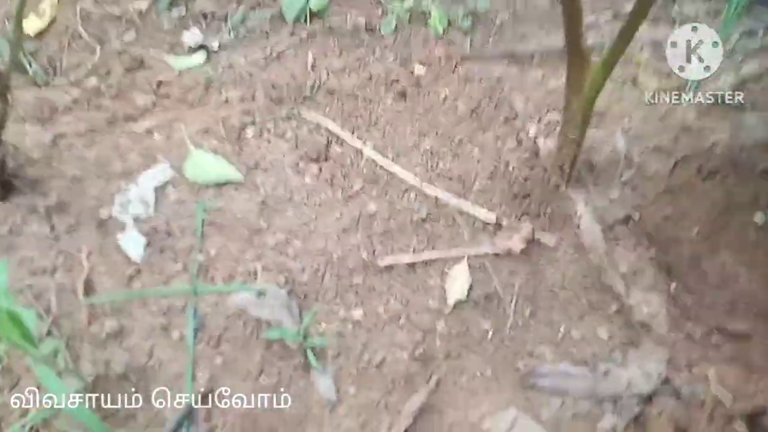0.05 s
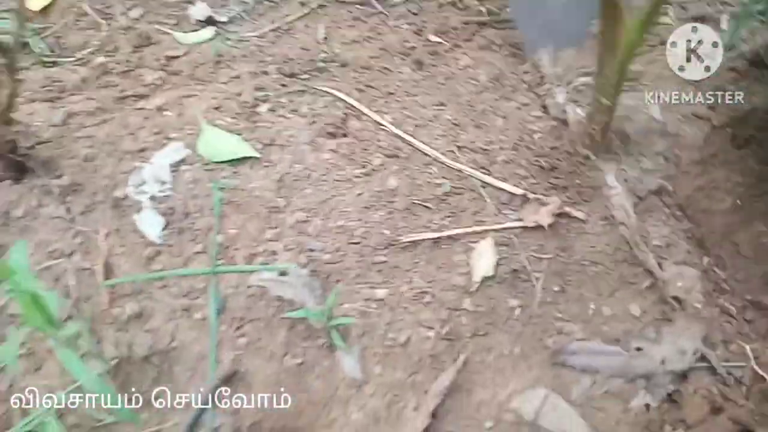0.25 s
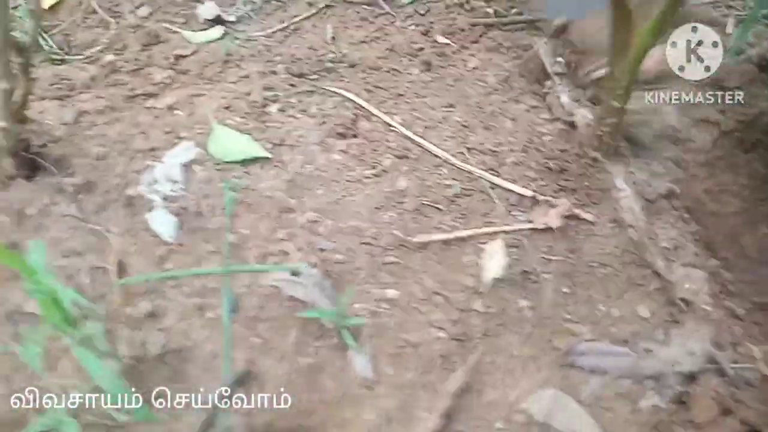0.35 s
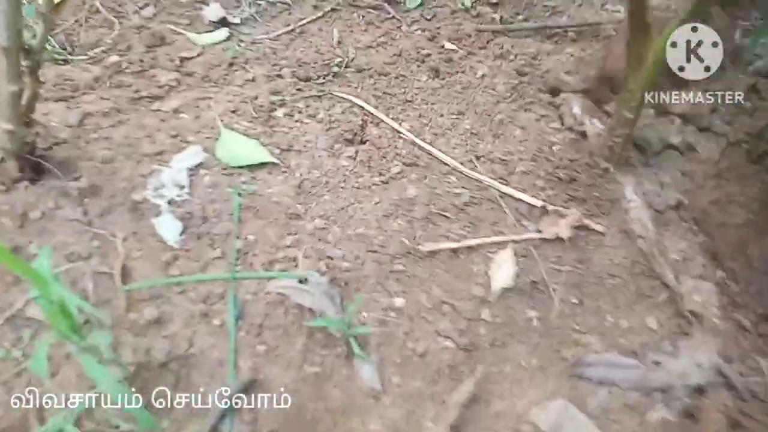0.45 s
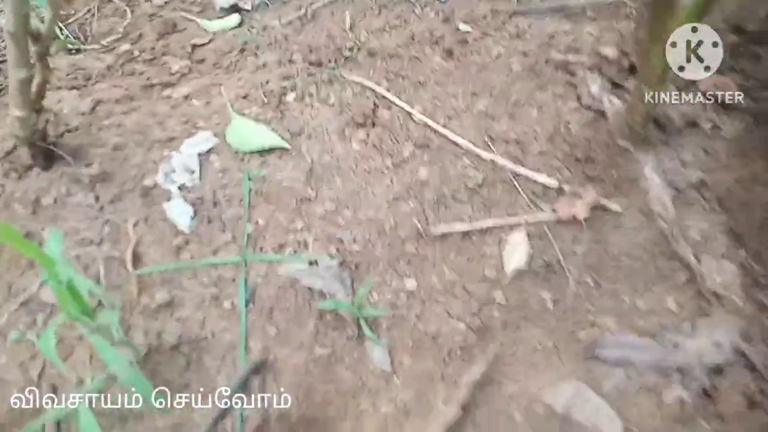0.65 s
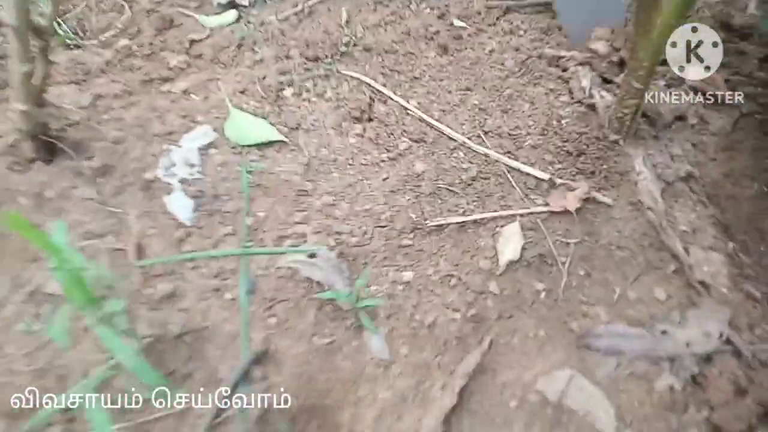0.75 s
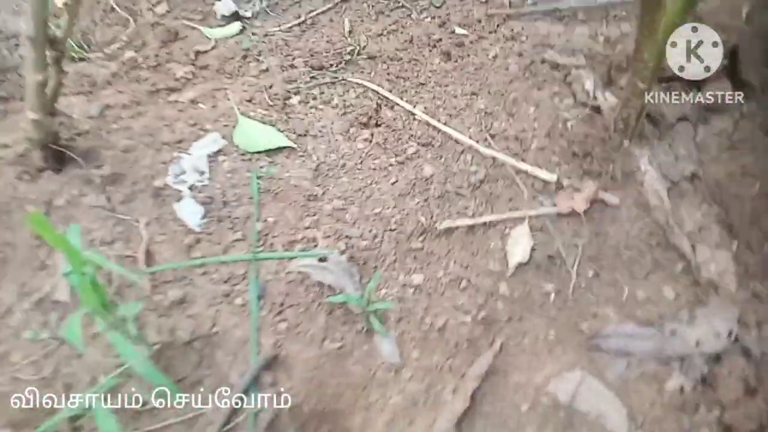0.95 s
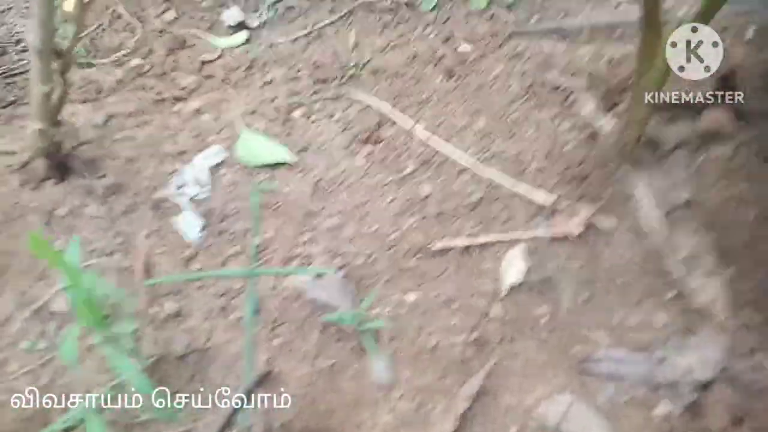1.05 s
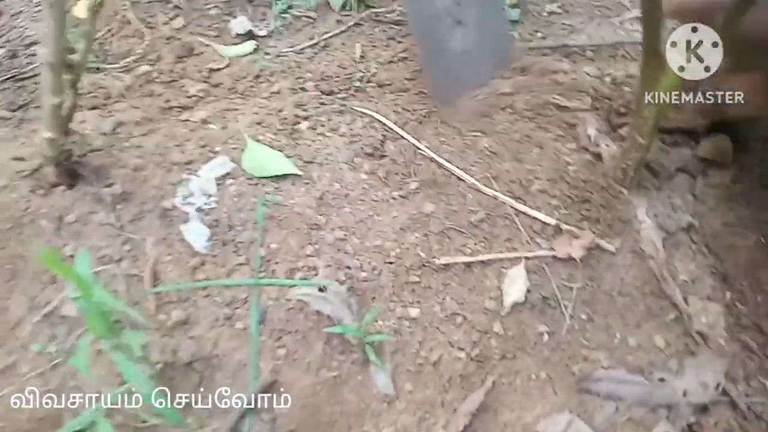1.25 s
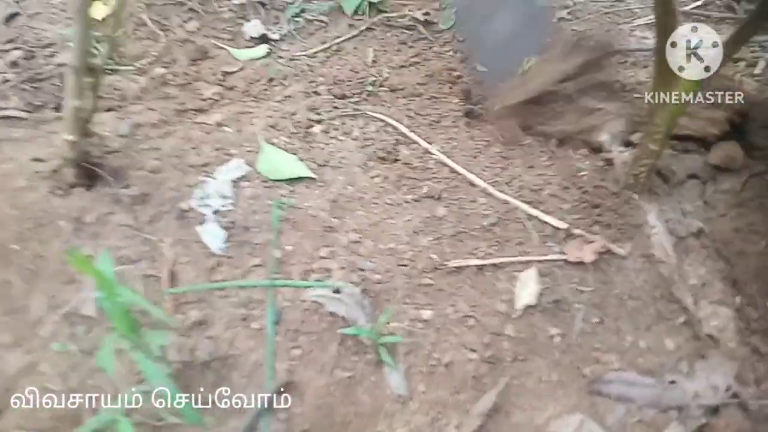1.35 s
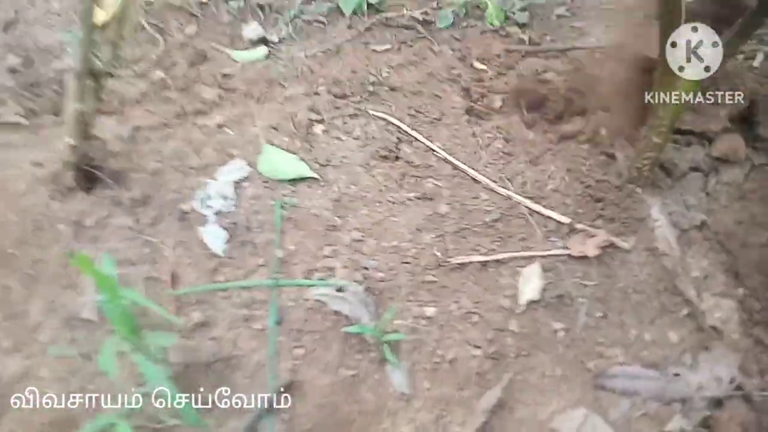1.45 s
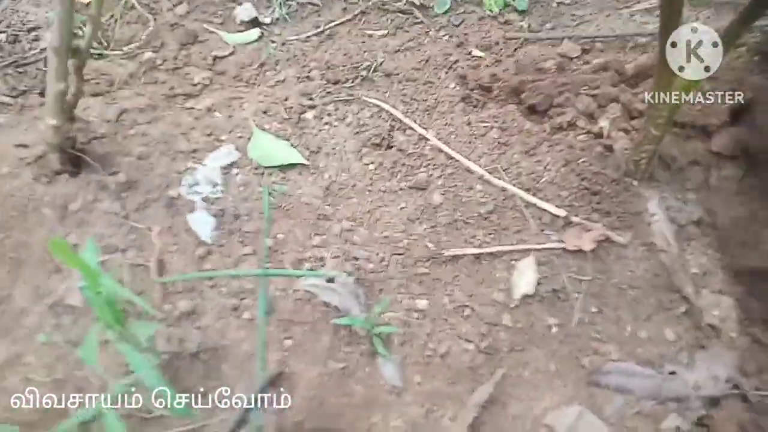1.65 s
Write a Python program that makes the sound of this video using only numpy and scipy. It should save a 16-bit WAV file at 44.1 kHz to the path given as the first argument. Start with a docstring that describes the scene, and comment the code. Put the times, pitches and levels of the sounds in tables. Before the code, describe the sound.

A hoe chops three times into dry garden soil, each blow clanking and scraping grit

```python
"""Quiet outdoor hiss and a small pebble tick come first; then a hoe chops three times into dry garden soil.
Each chop is a noise crunch, a damped clank summed from the steel's modes, and a late thud of swelling low tones.
Grit then scrapes along the blade as it is pulled out: grains and noise, coloured as soil and ringing the steel.
Clods snag in short bursts, single taps ring the blade, and pebbles tick as tiny snaps with gritty tails."""
import sys
import numpy as np
from scipy import signal
from scipy.io import wavfile
from scipy.ndimage import uniform_filter1d

SR = 44100
rng = np.random.default_rng(int(sys.argv[2]) if len(sys.argv) > 2 else 0)


def wav_record(signal):
    """Record a signal, one row per channel, as 16-bit PCM in the file named by sys.argv[1]."""
    frames = np.transpose(np.atleast_2d(signal))
    bounded = np.clip(frames, -1, 1)
    # unit amplitude maps onto the largest positive 16-bit level
    quanta = np.round(bounded * 32767).astype(np.int16)
    wavfile.write(sys.argv[1], SR, quanta)


N = 74970  # length in samples


def gain_of(db):
    """Decibels to an amplitude factor."""
    return 10 ** (np.asarray(db) / 20)


def evened(x):
    """Scale a signal to rms 1."""
    return x / np.sqrt(np.mean(x ** 2) + 1e-20)


def read(points, hz):
    """Read a spectrum table along a logarithmic frequency axis."""
    f, value = np.transpose(points)
    return np.interp(np.log(hz + 1), np.log(f + 1), value)


def add(mix, s, sound):
    """Lay a sound into the mix at s seconds, cut at the end of the mix."""
    part = mix[round(s * SR):][:len(sound)]
    part += sound[:len(part)]


def colour(x, points):
    """Minimum-phase filter with the given spectral shape; white noise keeps its level."""
    hz = abs(np.fft.fftfreq(4096, 1 / SR))
    log_gain = np.log(gain_of(np.maximum(read(points, hz), -100)))
    # The Hilbert transform of the log gain supplies the causal phase
    taps = np.fft.ifft(np.exp(np.conj(signal.hilbert(log_gain)))).real[:2048]
    return signal.oaconvolve(x, taps / np.linalg.norm(taps))[:len(x)]


# Spectral shape of the outdoor hiss: f/Hz, relative density/dB
AIR_SPECTRUM = [(150, -32.5), (250, -9.5), (420, -2), (700, -5.5), (1000, -5), (1900, -3), (2850, -3.5),
                (4000, -8), (4700, -16.5), (5300, -22.5), (6000, -17), (7200, -18.5), (8500, -23.5),
                (10000, -32.5), (11400, -27.5), (12500, -33.5), (13600, -25), (14600, -31), (15600, -42),
                (16400, -56)]
# Spectral shape of the low rumble: f/Hz, relative density/dB
RUMBLE_SPECTRUM = [(12, -56), (20, -23), (22, -21), (35, -17), (91, -2), (204, -9.5), (300, -18),
                   (390, -48), (660, -120)]
# Background drift: t/s, hiss level/dB, rumble level/dB
AIR_DRIFT = [(0.0, -56, -56), (0.132, -52, -54.5), (0.298, -59, -52.5), (0.468, -52, -54.5),
             (0.576, -52.5, -56), (1.022, -54.5, -57), (1.254, -53, -56), (1.452, -53.5, -55),
             (1.7, -53.5, -53)]


def air():
    """Outdoor bed: noise with patches drifting in time and pitch, over a lumpy rumble."""
    frames = N // 128 + 5
    real, imag, patches = rng.standard_normal((frames, 257, 3)).T
    patches = uniform_filter1d(patches, size=8, axis=0)  # across frequency
    patches = evened(uniform_filter1d(patches, size=12, axis=1))  # across time
    patchy = (real + 1j * imag) * gain_of(1.5 * patches)
    hush = signal.istft(patchy, nperseg=512, noverlap=384)[1][:N]
    hiss = evened(colour(hush, AIR_SPECTRUM))

    # The last point holds the spectrum at -72 dB above 500 Hz
    rumble = evened(colour(rng.standard_normal(N), RUMBLE_SPECTRUM + [(500, -72)]))
    s, hiss_db, rumble_db = np.transpose(AIR_DRIFT)
    t = np.arange(N) / SR
    return gain_of(np.interp(t, s, rumble_db)) * rumble + gain_of(np.interp(t, s, hiss_db)) * hiss


def thump(hz, db, swell):
    """Dull tone that swells to its peak in swell seconds, then dies away."""
    t = np.arange(6000) / SR
    return gain_of(db) * t / swell * np.exp(1 - t / swell) * np.sin(2 * np.pi * hz * t)


# Faint short tones nearby: t/s, f/Hz, level/dB, swell time/s
FAINT_TONES = [(1.19, 3050, -48, 0.0043), (1.364, 3020, -46, 0.0092), (1.527, 708, -45.5, .005),
               (1.674, 3185, -49.5, 0.011)]


def pings():
    """Faint pips, each a single tone that swells and fades."""
    out = np.zeros(N)
    for s, hz, db, swell in FAINT_TONES:
        add(out, s, thump(hz, db, swell))
    return out


# Pebbles and crumbs tick: t/s, level before the band-pass/dB, f/Hz
PEBBLES = [(.194, -36.5, 2000), (1.1658, -33, 1300), (1.189, -34, 1300), (1.2197, -15, 2580),
           (1.4211, -31.5, 2800), (1.649, -37, 1920), (1.679, -36.5, 1480)]
# Band kept of the ticks: low edge f/Hz, high edge f/Hz
PEBBLE_BAND = [570, 3590]
SNAP_DECAY_CYCLES, TICK_TAIL_DB, TICK_TAIL_T60_S = 0.27, -8.5, 0.03


def ticks():
    """Pebble ticks: a heavily damped sine snap with a short noise tail, band-passed."""
    out, t = np.zeros(N), np.arange(2000) / SR
    for s, db, hz in PEBBLES:
        snap = np.sin(2 * np.pi * hz * t) * t * hz * np.exp(-t * hz / SNAP_DECAY_CYCLES)
        tail = gain_of(TICK_TAIL_DB - 60 * t / TICK_TAIL_T60_S) * rng.standard_normal(len(t))
        add(out, s, gain_of(db) * (snap / abs(snap).max() + tail))
    return signal.sosfilt(signal.butter(6, PEBBLE_BAND, "band", fs=SR, output="sos"), out)


# Modes of the free steel blade: f/Hz, level/dB, t60/s
BLADE_MODES = [(1550, -2.5, 0.11), (2100, -6.5, 0.014), (2422, -1, 0.047), (2773, 3.5, 0.14),
               (2985, 2, .025), (3170, -10, 0.28), (3474, 4, 0.019), (3632, -7, 0.16), (3770, -8.5, 0.31),
               (4280, -6, 0.016), (4960, -17, 0.015), (5200, -16, 0.028), (6840, -21, 0.059),
               (11160, -30, 0.043)]
FOCUS_OCT = 0.2  # how far from its centre a blow reaches: modes this far off are 6.9 dB down


def blade(centre_hz, damp_s, focus=FOCUS_OCT, rise=0.00019):
    """Ring of the steel after one tap, strongest near centre_hz; soil contact shortens it; energy 1."""
    t = np.arange(8000) / SR
    ring = np.zeros(len(t))
    for hz, db, t60 in BLADE_MODES:
        off_centre_db = -6.9 * (np.log2(hz / centre_hz) / focus) ** 2
        decay_db = -60 * t * (1 / t60 + 1 / max(damp_s, .004))  # own loss plus soil loss
        ring += gain_of(db + off_centre_db + decay_db) * np.sin(2 * np.pi * hz * t)
    ring = ring * (1 - np.exp(-(t / rise) ** 2))
    return ring / np.linalg.norm(ring)


# Stones and hard clods knock the blade: t/s, level/dB, centre f/Hz, reach/octaves, soil-contact t60/s
KNOCKS = [(.2985, -36, 3000, 0.18, .03), (.322, -24.5, 2980, 0.097, .02), (.3225, -29.5, 4350, 0.081, .03),
          (.39, -30, 3100, .15, .03), (.815, -39, 5200, .1, 0.039), (.836, -38, 2760, 0.13, 0.11),
          (.853, -29, 2600, .9, 0.81), (1.306, -30, 2130, 0.091, .05), (1.325, -26, 2330, 0.067, 0.059),
          (1.335, -24, 2380, 0.12, .08), (1.336, -27.5, 3450, .12, 0.057), (1.3365, -43.5, 7060, .1, 0.25),
          (1.337, -59, 11200, .1, .1), (1.354, -57, 11200, .1, 0.092)]


def flicks():
    """Single soft-edged taps on the blade; lighter soil contact lets it ring longer."""
    out = np.zeros(N)
    for s, db, hz, reach, damp_s in KNOCKS:
        ring = blade(hz, damp_s, focus=reach, rise=0.0017)
        add(out, s, gain_of(db) * ring / abs(ring).max())
    return out


GRAINS_PER_S, GRAIN_SPREAD_DB = 3000, 4.5


def grains(count):
    """Dense random clicks of uneven size, as of many grains striking; rms 1."""
    hit = rng.random(count) < GRAINS_PER_S / SR
    strength = rng.standard_normal(count)
    boost = gain_of(GRAIN_SPREAD_DB * np.minimum(rng.exponential(1, count), 4))
    return evened(strength * hit * boost)


# Spectral shape of soil rubbing: f/Hz, relative density/dB
SOIL_SPECTRUM = [(59, -54), (100, -1.5), (826, -9), (959, -5), (1110, -15), (1320, -5.5), (1860, -13),
                 (2300, -5), (2560, -21.5), (3040, 0), (3920, -10.5), (4360, -11.5), (5880, -26.5),
                 (7120, -18.5), (7760, -33), (11900, -39.5), (14100, -34), (15400, -39), (16400, -65)]
# Clods catch on the edge: t/s, level/dB, length/s, centre f/Hz, soil share/dB
CLODS = [(0.297, -30.5, 0.018, 2730, -8), (.32, -25.5, 0.0084, 3010, -5), (0.337, -36.5, 0.021, 3100, -9.5),
         (0.365, -45, .01, 2800, -12), (.373, -40.5, 0.022, 3020, -26), (0.387, -38, 0.01, 3060, 0),
         (0.423, -51.5, 0.02, 3020, 4), (.45, -48.5, 0.0072, 3100, -0.5), (.794, -31, 0.022, 2580, 1.5),
         (0.81, -30, .017, 2760, 2), (0.833, -37.5, 0.019, 2700, -7), (1.305, -35.5, 0.0058, 2250, 3.5),
         (1.324, -34, 0.0056, 2450, 4.5), (1.335, -28.5, 0.012, 2570, -1), (1.352, -42, 0.012, 2900, 3)]
SNAG_T60_S, SNAG_FOCUS_OCT = 0.038, 0.17


def snags():
    """Each clod crumbles in a short burst of grains and noise that shakes the steel."""
    out, t = np.zeros(N), np.arange(3000) / SR
    for s, db, length, hz, soil_db in CLODS:
        burst = np.sin(np.pi * np.clip(t / length, 0, 1) ** 0.66)
        force = (grains(len(t)) + 1.4 * rng.standard_normal(len(t))) * burst
        force = force / np.linalg.norm(force) * np.sqrt(length * SR / 2)  # energy follows length
        steel = signal.oaconvolve(force, blade(hz, SNAG_T60_S, SNAG_FOCUS_OCT))[:len(t)]
        soil = colour(force, SOIL_SPECTRUM)
        add(out, s, gain_of(db) * (steel + gain_of(soil_db) * soil))
    return out


# Pulls of the blade through soil: start t/s, end t/s, drive level at start/dB, at end/dB
BLADE_PULLS = [(.245, 0.407, -36, -48), (0.766, 0.861, -35, -47), (1.281, 1.369, -39.5, -42.5)]
PULL_FADE_S, GRIT_DB, STEEL_DB = 0.0027, 0, -7


def scrape():
    """Grit rattles past the blade during each pull: soil noise plus damped steel."""
    t, press = np.arange(N) / SR, np.zeros(N)
    for start, end, start_db, end_db in BLADE_PULLS:
        fade = np.clip(np.minimum(t - start, end - t) / PULL_FADE_S, 0, 1)
        press += gain_of(np.interp(t, [start, end], [start_db, end_db])) * fade
    force = grains(N) * press
    steel = signal.oaconvolve(force, blade(2500, 0.014, focus=0.47))[:N]
    rub = press * (0.63 * rng.standard_normal(N)) + 0.68 * force
    return gain_of(GRIT_DB) * colour(rub, SOIL_SPECTRUM) + gain_of(STEEL_DB) * steel


# Earth and handle take the blow, one list per chop: f/Hz, level/dB, delay after chop start/s, swell time/s
THUD_TONES = [
    [(214, -13.5, 0.0032, 0.0026), (399, -16, 0.00448, 0.0035), (538, -14, 0.00409, 0.0025),
     (740, -21, 0.00291, 0.0034), (1125, -18.5, 0.00197, 0.0026)],
    [(110, -18.5, 0.0043, 0.0046), (195, -16, 0.0037, 0.0028), (352, -19, 0.00325, 0.0031),
     (512, -22, 0.00262, 0.0046), (781, -18, 0.00092, 0.0036), (1090, -19, 0.00097, 0.0029)],
    [(127, -17, 0.0033, 0.0033), (356, -24.5, 0.0043, 0.0029), (444, -20.5, 0.00393, 0.0026),
     (860, -50, 0.0025, .002), (1195, -15.5, 0.00201, .0015)],
]


def thuds():
    """Low body of each chop: several dull tones that swell just after the edge goes in."""
    out = np.zeros(N)
    for chop, tones in zip(HOE_CHOPS, THUD_TONES):
        for hz, db, delay, swell in tones:
            add(out, chop[0] + delay, thump(hz, db, swell))
    return out


# Hoe blows: t/s, crunch level/dB, crunch half-length/s, clank delay/s, clank rise/s, soil-contact t60/s,
# clank level/dB, clank centre f/Hz, bounce delay/s, bounce level re clank/dB, crack level/dB,
# crack spectrum lift above 10 kHz/dB
HOE_CHOPS = [(0.235, -18.5, 0.0086, .0012, 0.0011, 0.014, -2.5, 3190, 0.0043, -12, -28, 9),
             (0.7593, -16, 0.0078, .0033, 0.001, .014, -4, 3280, .002, -5, -21, 5),
             (1.2679, -15.5, 0.007, .0028, 0.00059, 0.017, -4, 2630, .004, -17, -20.5, 5.5)]
# Spectral shape of the crunch: f/Hz, relative density/dB
CRUNCH_SPECTRUM = [(350, -48.5), (600, -14), (1170, -5.5), (2020, -9.5), (2670, -2), (3090, -24),
                   (3460, -2.5), (4240, -11), (4720, -10.5), (5090, -20.5), (6000, -29.5), (7800, -33),
                   (13200, -120)]
# Spectral shape of the clank's treble: f/Hz, relative density/dB
CRACK_SPECTRUM = [(2650, -34), (4500, 3), (4750, -17), (5070, -4), (5740, -3), (7240, 3.5), (8150, -17),
                  (12100, -19.5), (14100, -11.5), (15800, -30), (16400, -55)]
CRACK_S = .002  # time constant of the crack


def chops():
    """Crunch of the edge entering, then the blade bottoms out with a clank, a bounce and a bright crack."""
    out, t = np.zeros(N), np.arange(3000) / SR
    for (s, crunch_db, half_length, delay, rise, t60, clank_db, hz,
         bounce, bounce_db, crack_db, sheen_db) in HOE_CHOPS:
        shape = np.sin(np.pi * np.clip(t / (2 * half_length), 0, 1) ** .5) ** 2
        crunch = shape * colour(rng.standard_normal(len(t)), CRUNCH_SPECTRUM)
        add(out, s, gain_of(crunch_db) * crunch)

        clank = blade(hz, t60, rise=rise)
        clank = gain_of(clank_db) * clank / abs(clank).max()
        add(out, s + delay, clank)
        add(out, s + delay + bounce, gain_of(bounce_db) * clank)

        u = t / CRACK_S
        burst = u * np.exp(-u) + 0.17 * np.exp(-u / 3)  # main burst and a longer tail
        spectrum = [(f, db + sheen_db * (f > 1e4)) for f, db in CRACK_SPECTRUM]
        crack = burst * colour(rng.standard_normal(len(t)), spectrum)
        add(out, s + delay - CRACK_S / 2, gain_of(crack_db) * crack)
    return out


LOW_CUT_HZ = 96


def scene():
    """Low-cut hoe, pebbles and faint tones over the full-range background; one channel."""
    hoe = chops() + thuds() + pings() + scrape() + snags() + flicks() + ticks()
    hoe = signal.sosfilt(signal.butter(2, LOW_CUT_HZ, "high", fs=SR, output="sos"), hoe)
    return (air() + hoe)[None]


EDGE_HZ = 16500


def record(dry):
    """Band limit of the recorder: a steep linear-phase low-pass."""
    taps = signal.firwin(511, EDGE_HZ, window=("kaiser", 9), fs=SR)
    return signal.oaconvolve(dry, taps[None], "same")


dry = scene()
out = record(dry)
wav_record(out)
```